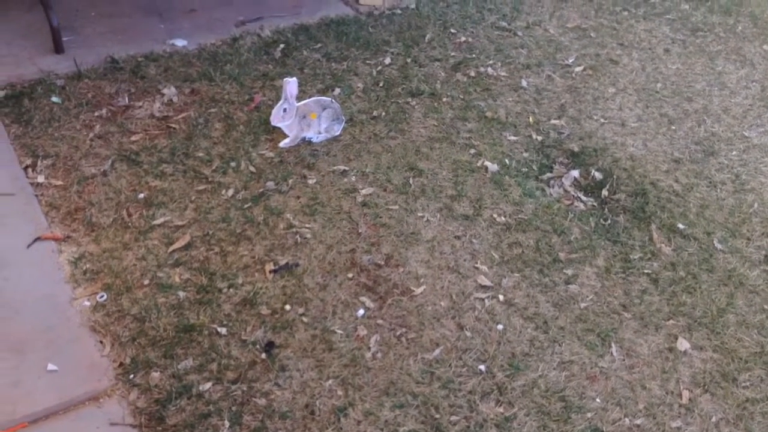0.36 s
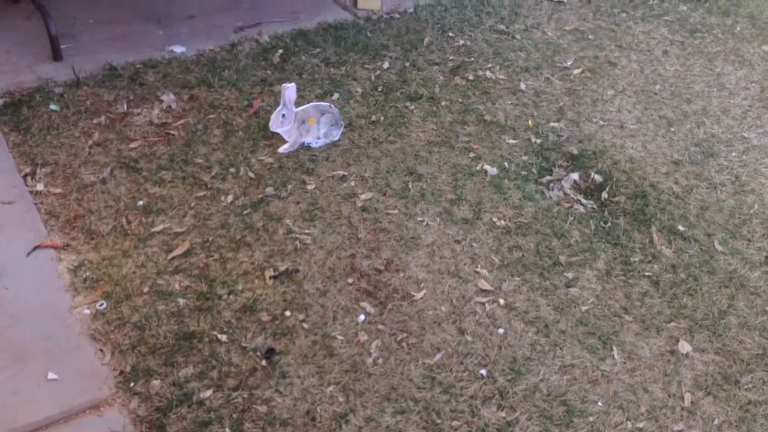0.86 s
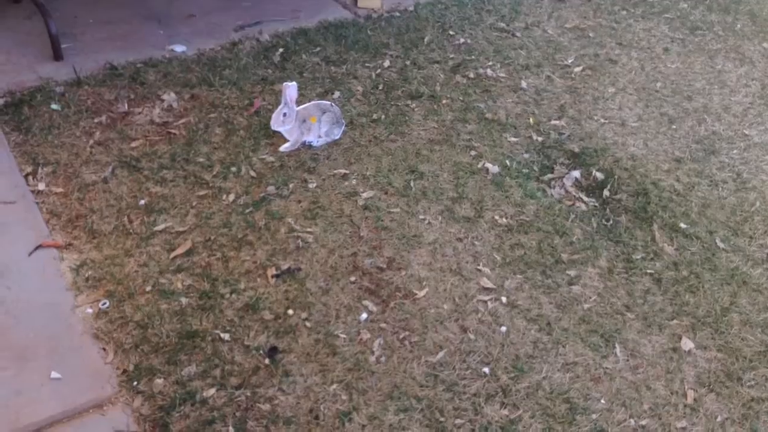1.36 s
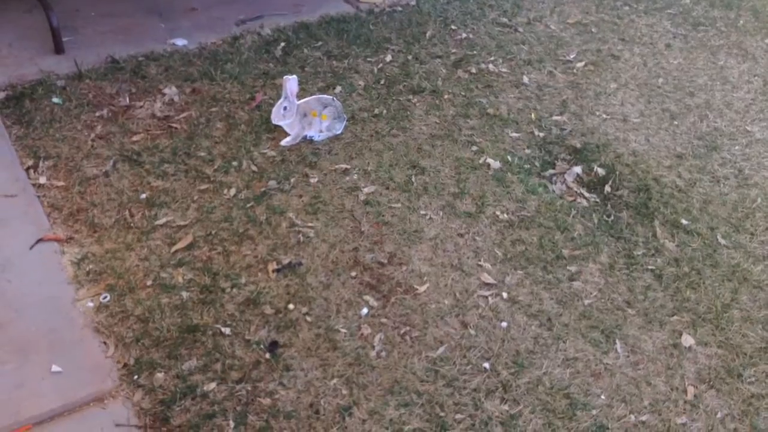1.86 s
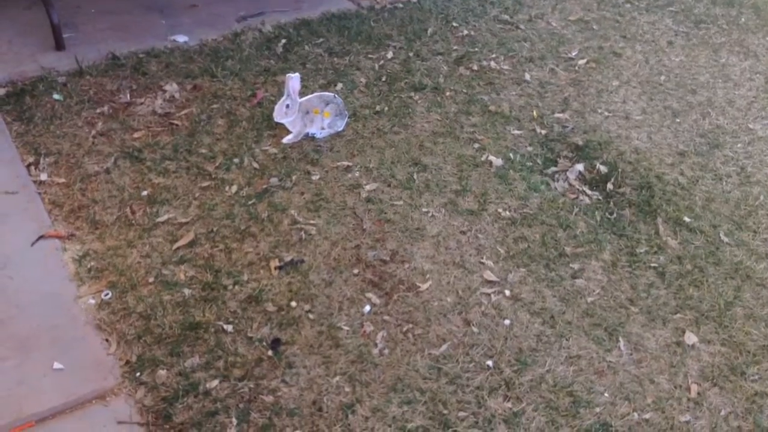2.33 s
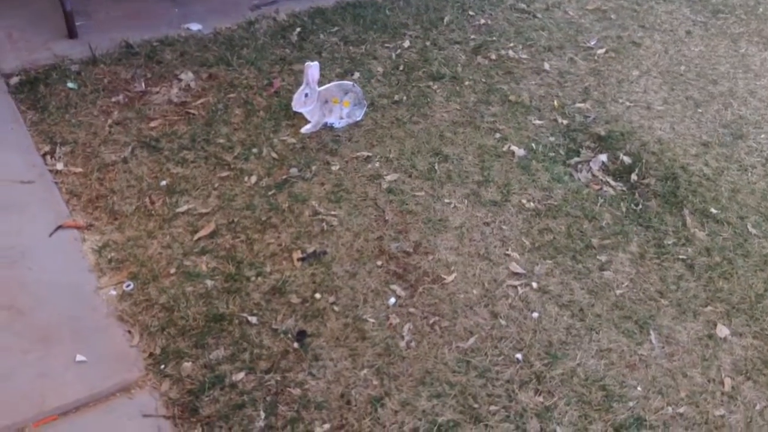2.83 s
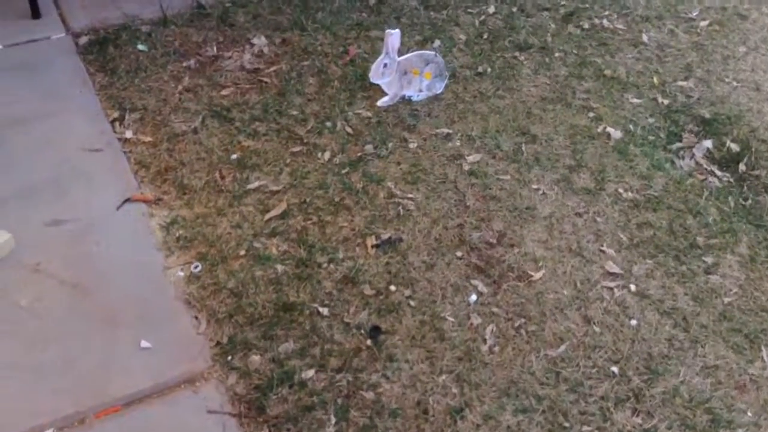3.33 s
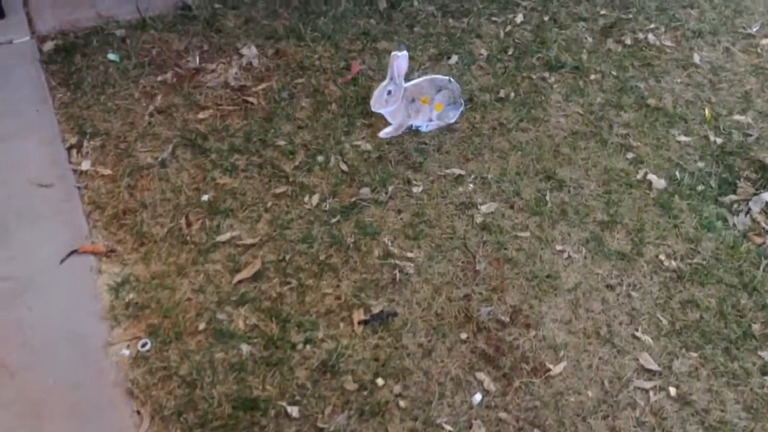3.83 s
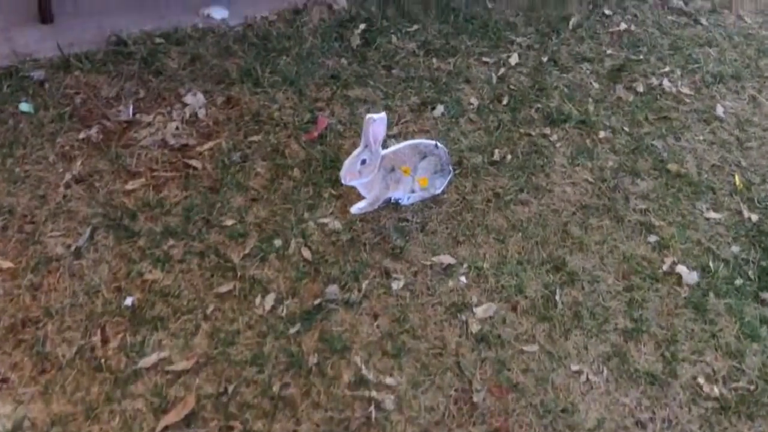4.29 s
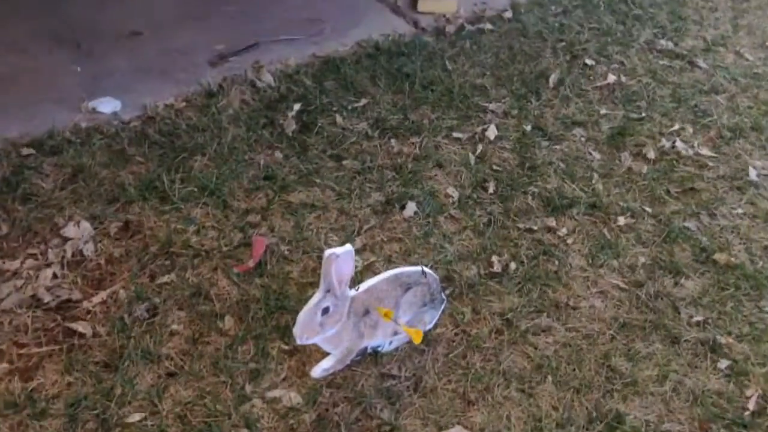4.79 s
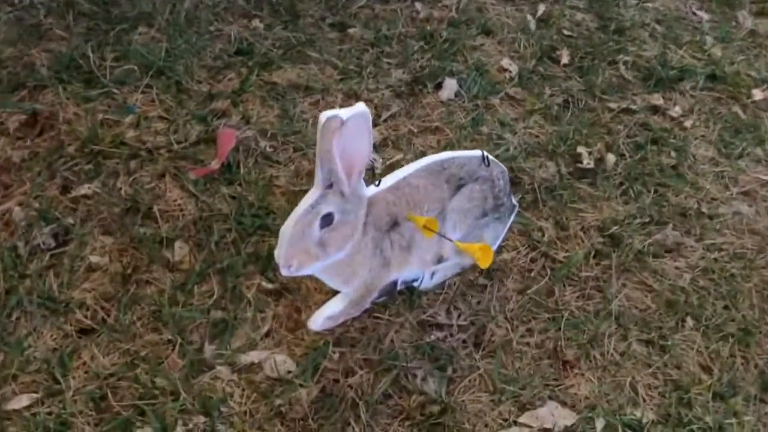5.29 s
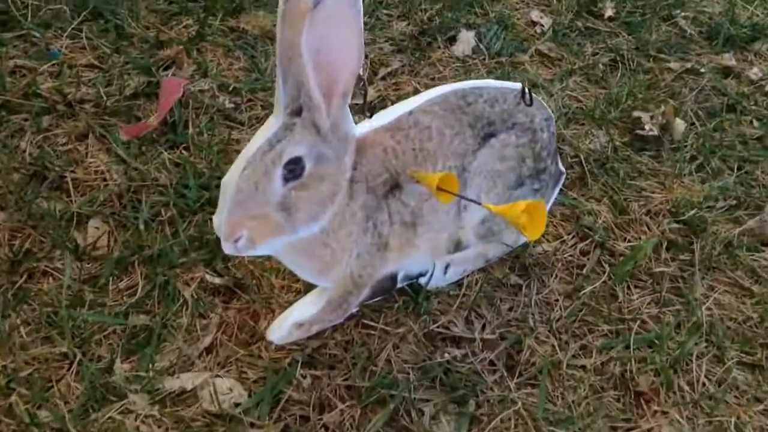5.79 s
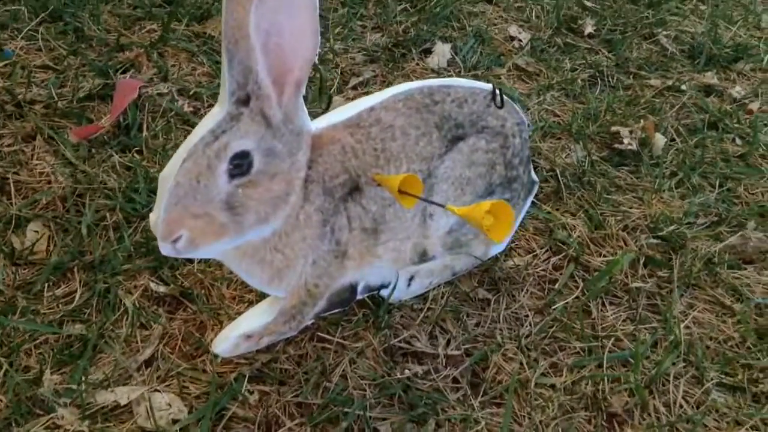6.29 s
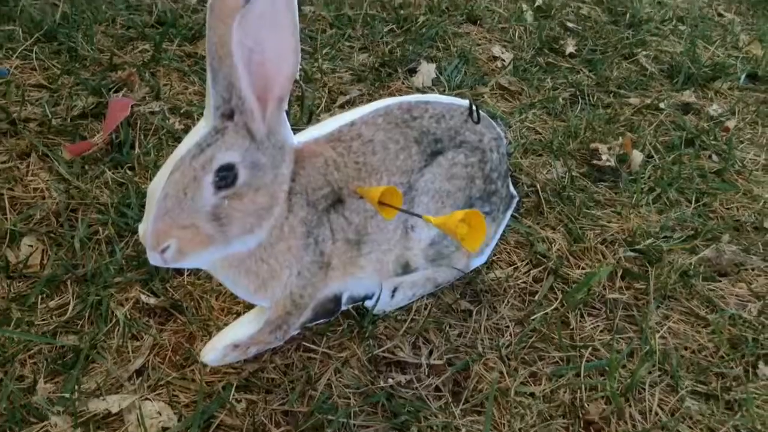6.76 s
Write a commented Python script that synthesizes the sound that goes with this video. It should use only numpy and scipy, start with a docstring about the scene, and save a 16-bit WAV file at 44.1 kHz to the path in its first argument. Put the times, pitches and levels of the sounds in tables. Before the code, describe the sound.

A blowgun pops and its dart cracks into a rabbit-shaped card almost instantly, echoes slapping off walls, while a low machine drone and fan rush continue.

```python
"""Blowgun shot in a yard

Air hisses ahead of the shot, the muzzle pops, and the dart whistles and smacks a card target: shaped noise and dying tones.
Walls throw pop and smack back as short slaps, one clear echo and scattered reflections; soft steps follow in grass.
A compressor hums as a stack of tones locked to its shaft, over the noise of its fan. Wall echoes change
the colour of the hum as the listener walks up to the target. One microphone feeds both channels."""
import sys
import numpy as np
from scipy import signal
from scipy.fft import rfft, irfft
from scipy.io import wavfile
from scipy.ndimage import uniform_filter1d

SR = 44100
rng = np.random.default_rng(int(sys.argv[2]) if len(sys.argv) > 2 else 0)


def ratio_of_db(decibels):
    """Turn decibels (scalar or array-like) into linear amplitude factors; 0 dB maps to 1."""
    return 10 ** (np.asarray(decibels, float) / 20)


def persist_wave(psi):
    """Save psi, clipped to +-1, as 16-bit WAV."""
    counts = np.round(np.clip(psi, -1, 1) * 32767).astype(np.int16)
    wavfile.write(sys.argv[1], SR, np.atleast_2d(counts).T)


N = 314874  # length [samples]
SHAFT_HZ = 29.02  # turns of the compressor shaft per second

# The listener's walk: (time [s], extra distance from the compressor [m])
WALK = [(2.3, 0), (2.8, .027), (3.2, .118), (3.6, .093), (4.0, .631), (4.4, .854), (4.8, 1.164),
        (5.2, 1.41), (5.7, 1.659), (6.3, 1.726), (7.1, 1.704)]
# Muzzle pop and its first reflections: (time [s], level [dB], share of treble [ratio], polarity [+1 or -1])
POPS = [(1.61845, -5, 1, 1), (1.62240, -11, .6, 1), (1.62493, -16, 1, 1), (1.6279, -15, .1, -1),
        (1.6318, -19, .1, -1), (1.6360, -19, .8, 1), (1.6411, -22, .7, -1), (1.6425, -22, .8, 1),
        (1.6466, -22, .3, -1)]


def read(points, hz):
    """Reads a spectrum between its points, on a log-frequency axis."""
    f, value = np.transpose(points)
    return np.interp(np.log(hz + 1), np.log(f + 1), value)


def evened(x):
    """Scales a sound to rms 1."""
    return x / np.sqrt(np.mean(x ** 2) + 1e-20)


def add(mix, s, sound):
    """Mixes a sound in at s seconds."""
    part = mix[round(s * SR):][:len(sound)]
    part += sound[:len(part)]


def coloured(size, points):
    """Noise of rms 1 with a given spectrum."""
    hz = np.fft.rfftfreq(size, 1 / SR)
    spectrum = rfft(rng.standard_normal(size)) * ratio_of_db(read(points, hz))
    return evened(irfft(spectrum, size))


def ring(modes, size=6000):
    """Sum of dying tones, as a struck body or air column gives."""
    t = np.arange(size) / SR
    return sum(ratio_of_db(db - 60 * t / t60) * np.sin(2 * np.pi * hz * t) for hz, db, t60 in modes)


def puff(ms, peak_ms):
    """Pulse shape that rises to 1 at peak_ms and then dies away."""
    return np.e * ms / peak_ms * np.exp(-ms / peak_ms)


def band(x, lo_hz, hi_hz):
    """Band-pass that never rings ahead of its input."""
    return signal.sosfilt(signal.butter(2, [lo_hz, hi_hz], "band", fs=SR, output="sos"), x)


def clatter(turns, place, size=4096):
    """Valve clatter: one random turn for each place, repeated and cross-faded along the walk."""
    # Clatter spectrum: (frequency [Hz], level per shaft order [dB])
    colour = [(500, -85), (700, -74), (1300, -74.5), (2000, -76), (3000, -76), (4500, -84), (8000, -104)]
    a, b = rng.standard_normal((2, 5, size // 2 + 1))
    level = ratio_of_db(read(colour, SHAFT_HZ * np.arange(size // 2 + 1)))
    one_turn = irfft((a + 1j * b) * level, size) * size / 2
    at = (turns % 1 * size).astype(int)
    return sum(np.cos(np.pi / 2 * np.clip(place - k, -1, 1)) * wave[at] for k, wave in enumerate(one_turn))


def compressor(waver=.009):
    """Multiples (orders) of the shaft rate; echoes add to or cancel each one as the detours change."""
    # What the compressor sends out: {order of the shaft: level [dB]}
    orders = {2: -83.5, 3: -75, 4: -73, 5: -67, 6: -59.5, 7: -49, 8: -70.5, 9: -50.5, 10: -56, 11: -75, 12:
              -69, 13: -64.5, 14: -86, 15: -74, 16: -72, 17: -85, 18: -67, 19: -70, 20: -72, 21: -75.5, 23:
              -79, 30: -73.5, 38: -73, 39: -72.5, 47: -71.5, 48: -74.5, 50: -71}
    # Walls that throw the hum back: (detour at the shooting spot [m], detour gained per metre walked [m/m],
    # signed share of the direct sound [ratio])
    walls = [(1.529, 0.265, 0.332), (3.83, -0.013, 0.095), (4.188, -0.659, -0.544), (4.962, 0.635, -0.633),
             (5.307, 0.001, -0.351), (6.758, 0.862, 0.122), (7.003, -0.578, -0.495), (8.023, 1.161, 0.254),
             (8.25, 0.158, -0.798), (8.592, -0.719, 0.184), (8.724, 0.477, 0.245), (9.392, -0.173, -0.415),
             (9.861, 1.176, -0.381), (14.245, -1.768, 0.127)]
    # Level of the side tone: (time [s], level [dB])
    side_level = [(0, -57), (1.2, -68.5), (3.2, -65), (3.8, -65), (4.8, -55.5), (5.4, -72), (7.14, -61)]
    side_hz = 347.2  # a faint tone that beats with the twelfth order
    smear = .568  # phase bend away from the seventh order [rad per order squared]: a stroke is a short sweep
    place_m = .43  # the clatter's fine pattern is new after this walk
    sound_speed = 343  # [m/s]

    t = np.arange(N) / SR
    # waver is the rms drift of the shaft in turns
    drift = evened(sum(np.sin(2 * np.pi * (f * t + rng.random())) / f for f in np.geomspace(.3, 3, 8)))
    walked = np.interp(t, *np.transpose(WALK))
    turns = SHAFT_HZ * (t - walked / sound_speed) + waver * drift

    # the echoes change slowly, so every 256th sample is enough
    coarse_t, coarse_walk = t[::256], walked[::256]
    side_amp = ratio_of_db(np.interp(t, *np.transpose(side_level)))
    hum = side_amp * np.cos(2 * np.pi * (side_hz * t + rng.random()))
    for k, db in orders.items():
        paths = 1  # direct sound, then the echoes
        for detour, gain, share in walls:
            delay = (detour + gain * coarse_walk) / sound_speed
            paths = paths + share * np.exp(-2j * np.pi * k * SHAFT_HZ * delay)
        phase = np.interp(t, coarse_t, np.unwrap(np.angle(paths))) + smear * (k - 7) ** 2
        strength = ratio_of_db(db) * np.interp(t, coarse_t, abs(paths))
        hum += strength * np.sin(k * 2 * np.pi * turns + phase)
    return np.sqrt(2) * hum + clatter(turns, np.clip(walked / place_m, 0, 4))


def rush(split_hz=4000, patchy_db=0.94, ripple_db=1.7):
    """Smooth fan noise; treble and body rise and fall as the microphone turns."""
    # Fan spectrum before the final level is set: (frequency [Hz], relative level per Hz [dB])
    colour = [(30, -36), (70, -37), (120, -28), (200, -0.5), (280, -4), (400, -4.5), (600, -2.5),
              (800, -5.5), (1000, -5), (1400, -3.5), (2200, -7), (3500, -9), (6000, -11.5), (9000, -11.5),
              (13000, -11.5), (15300, -13), (15450, -72)]
    # How squarely the microphone faces the fan: (time [s], treble [dB], body [dB])
    facing = [(0, -0.5, 0), (1.1, -1.4, -1), (2.2, -0.2, 0.5), (2.8, -0.1, -0.5), (3.2, -1.3, -0.5),
              (3.75, 1, 2.5), (4.45, -1.7, -0.5), (5.4, 1, -1.5), (6.0, 0, -2.5), (6.65, -3, -1.5),
              (7.14, -1.5, -2)]
    # the low rush is weaker at the shooting spot and fills in over the first steps
    shelter_db, shelter_hz, shelter_m = -4, 750, 0.25

    frames, hz = N // 256 + 5, np.fft.rfftfreq(1024, 1 / SR)
    a, b, patches, ripple = rng.standard_normal((frames, 513, 4)).T
    # reflections comb the spectrum finely and change slowly
    ripple = evened(uniform_filter1d(ripple, 120, 1))
    # broader patches come and go faster
    patches = evened(uniform_filter1d(uniform_filter1d(patches, 14, 0), 16, 1))

    t = np.arange(frames) * 256 / SR
    at, treble_db, body_db = np.transpose(facing)
    high = (1 / (1 + (split_hz / (hz + 1)) ** 4))[:, None]  # 0 in the body, 1 in the treble
    swing_db = high * np.interp(t, at, treble_db) + (1 - high) * np.interp(t, at, body_db)
    sheltered = 1 - np.clip(np.interp(t, *np.transpose(WALK)) / shelter_m, 0, 1)
    swing_db = swing_db + shelter_db * sheltered / (1 + (hz[:, None] / shelter_hz) ** 4)

    level_db = read(colour, hz)[:, None] + swing_db + patchy_db * patches + ripple_db * ripple
    noise = signal.istft((a + 1j * b) * ratio_of_db(level_db), nperseg=1024, noverlap=768)[1][:N]
    return ratio_of_db(-46.0) * evened(noise)


def hum_swells():
    """High tones of the compressor hum, each under a half-sine swell."""
    # High tones of the compressor hum that swell once: (start [s], end [s], frequency [Hz], level [dB])
    tones = [(2.6, 3.6, 638, -57), (2.5, 3.7, 1393, -62), (2.8, 4.7, 1364, -63), (0, 1.9, 1451, -64),
             (6.2, 7.14, 638, -64), (5.4, 7.14, 1131, -63)]
    out = np.zeros(N)
    for start, end, hz, db in tones:
        t = np.arange(0, end - start, 1 / SR)
        swell = np.sin(np.pi * t / t[-1])
        add(out, start, np.sqrt(2) * ratio_of_db(db) * swell * np.sin(2 * np.pi * hz * t))
    return out


def blow():
    """Air hiss swells while the dart runs down the tube and dies after the pop; the dart whistles."""
    # Spectrum of the air hiss: (frequency [Hz], relative level per Hz [dB])
    leak_colour = [(1500, -5), (3000, -2.5), (4800, -4), (6300, 2.5), (7300, -3), (9400, 4.5), (10500, 0.5),
                   (15200, -1), (15500, -50)]
    # Whistle of the dart, leaving the tube and in flight: (start [s], end [s], level [dB], fade by the end [dB])
    whistles = [(1.602, 1.64, -37, -17), (1.628, 1.69, -47.5, -2)]
    peak_db, lead_s, whistle_hz = -31, .125, 9386
    swell_db_per_s, drop_db, fade_db_per_s = 161, -1, 350

    out, t = np.zeros(N), np.arange(-lead_s, .08, 1 / SR)  # t is 0 at the pop
    leak_db = peak_db + np.where(t < 0, swell_db_per_s * t, drop_db - fade_db_per_s * t)
    hiss = ratio_of_db(leak_db) * signal.windows.tukey(len(t), .2) * coloured(len(t), leak_colour)
    add(out, POPS[0][0] - lead_s, hiss)
    for start, end, db, fade_db in whistles:
        t = np.arange(0, end - start, 1 / SR)
        tone = np.sin(2 * np.pi * whistle_hz * t) * signal.windows.tukey(len(t), .3)
        add(out, start, np.sqrt(2) * ratio_of_db(db + fade_db * (t / t[-1]) ** 2) * tone)
    return out


def bursts_and_knocks():
    """Short bursts of noise, each holding only part of the spectrum; then hollow knocks."""
    # Short noise bursts around the pop, then slaps of pop and smack off walls:
    # (time [s], level [dB], low edge [Hz], high edge [Hz], length [ms])
    bursts = [(1.6168, -31, 1500, 8000, 2), (1.6192, -28, 2000, 8000, 2), (1.6262, -31, 3000, 8000, 3),
              (1.6530, -36, 2000, 5000, 4), (1.6275, -32, 400, 1700, 3), (1.6320, -31, 500, 1500, 4),
              (1.6345, -32, 1500, 4800, 4), (1.6395, -31, 500, 1600, 5), (1.6455, -33, 500, 1500, 4),
              (1.6510, -35, 700, 1700, 5), (1.7200, -40, 600, 900, 7), (1.6810, -32, 380, 620, 9),
              (1.7040, -38, 300, 500, 8), (1.7230, -40, 320, 600, 8), (1.7100, -38, 1800, 2200, 9),
              (1.7000, -35, 900, 1100, 7), (1.7310, -41, 700, 2500, 5), (1.6950, -34, 270, 400, 12),
              (1.7085, -35, 880, 1020, 8), (1.7335, -39, 280, 480, 8), (1.7676, -35, 2400, 3200, 2),
              (1.7765, -42, 900, 3500, 6), (1.7825, -41, 700, 950, 5), (1.7935, -42, 720, 880, 9),
              (1.7950, -43, 1000, 5000, 4), (1.8170, -44, 680, 820, 7), (1.8200, -41, 280, 420, 13),
              (1.8090, -43, 1200, 4000, 5)]
    # Late hollow knocks: (time [s], level [dB], frequency [Hz], time to fall 60 dB [s])
    knocks = [(1.7861, -31, 810, .035), (1.8791, -30, 900, .028)]
    out = np.zeros(N)
    for (s, db, lo_hz, hi_hz, ms), noise in zip(bursts, rng.standard_normal((len(bursts), 1000))):
        size = min(round(ms * SR / 1000), 600)
        burst = band(band(noise, lo_hz, hi_hz), lo_hz, hi_hz)[-size:]
        add(out, s, ratio_of_db(db) * evened(burst) * signal.windows.tukey(size, .7))
    for s, db, hz, t60 in knocks:
        knock = ring([(hz, db, t60), (hz * 1.7, db - 6, t60 / 4)])
        add(out, s, -band(knock, 400, 3000))
    return out


def muzzle(push_ms=0.053, suck_ms=0.37):
    """A sharp snap on a pressure push with a slow undershoot, while the air column rings."""
    # Ringing air in the tube: (frequency [Hz], level [dB], time to fall 60 dB [s])
    tube = [(231, -21.5, 0.12), (349, -21.5, 0.06), (437, -19, 0.059), (870, -28, 0.038), (1076, -30, 0.07),
            (1330, -27, 0.11), (2010, -25, 0.024)]
    snap_hz, snap_ms = 4300, .17
    out, ms = np.zeros(N), np.arange(6000) / SR * 1000
    snap = np.sin(2 * np.pi * snap_hz * ms / 1000) * np.exp(-ms / snap_ms)
    push = puff(ms, push_ms) - .45 * puff(ms, suck_ms)
    for s, db, treble, sign in POPS:
        pop = 1.36 * treble * snap + 0.59 * push + ring(tube)
        add(out, s, sign * ratio_of_db(db) * pop)
    return band(out, 196, 10000)  # a small opening sends out no bass


def yard(x, decays, gap_s, uneven_db):
    """Scattered reflections, a few much stronger than the rest; each band dies at its own speed."""
    taps = np.zeros(SR // 2)
    at = np.arange(round(gap_s * SR), len(taps) - 20, 20)
    size = ratio_of_db(uneven_db * np.minimum(rng.exponential(1, len(at)), 4))
    taps[at + rng.integers(0, 20, len(at))] = rng.choice([-1., 1.], len(at)) * size
    hz, t, z = signal.stft(taps, SR, nperseg=128)
    fade = ratio_of_db(-60 * t / read(decays, hz)[:, None])
    tail = signal.istft(z * fade, SR, nperseg=128)[1]
    return signal.oaconvolve(x, tail / np.linalg.norm(tail))[:N]


def reflections(pop, crackle, body):
    """The yard nearby and the houses far off scatter the shot back."""
    # Decay in the yard: (frequency [Hz], time to fall 60 dB [s])
    near_decay = [(250, 0.074), (800, 0.1), (1100, 0.35), (2000, 0.26), (4000, 0.12), (8000, 0.18),
                  (15000, 0.13)]
    # Decay among far houses: (frequency [Hz], time to fall 60 dB [s])
    far_decay = [(250, 1), (800, 1), (2000, 0.98), (4000, 0.38), (8000, .15)]
    near = ratio_of_db(-8) * yard(pop, near_decay, gap_s=0.0098, uneven_db=6.5)
    near += ratio_of_db(-9.0) * yard(crackle, near_decay, gap_s=.0064, uneven_db=5.0)
    near += ratio_of_db(-24) * yard(body, near_decay, gap_s=.025, uneven_db=3)
    far = yard(pop + crackle + 0.63 * body, far_decay, gap_s=.04, uneven_db=1.0)
    return near + ratio_of_db(-20.5) * far


def target():
    """Each blow is a burst of crackle plus the ring of the card."""
    # Blows on the target: (time [s], crack level [dB], card ring level [dB])
    smacks = [(1.67827, -10.5, -16), (1.68075, -13, -21.3), (1.68175, -17, -45), (1.68377, -26, -19.8),
              (1.68719, -27, -18.3), (1.68952, -26, -20.1), (1.69384, -29, -26.6), (1.70273, -27, -26.1)]
    # Spectrum of the crack: (frequency [Hz], relative level per Hz [dB])
    crack_colour = [(300, -28), (1000, -17), (1300, -3), (1700, -3.5), (2400, -8.5), (3300, 0.5),
                    (4500, 2.5), (5500, 0), (6300, -3.5), (7200, -4.5), (8500, -8), (10800, -1),
                    (12000, -6.5), (13700, 0), (15000, -1), (15500, -9), (16500, -12)]
    # Ringing card: (frequency [Hz], level [dB], time to fall 60 dB [s])
    card = [(797, -5.2, .042), (875, -11.1, .049), (954, -3.2, .048), (324, -20, 0.075), (1440, -17, 0.016),
            (2056, -14, 0.03), (3500, -29, 0.012), (7240, -14, 0.025)]
    crack_ms = .62  # time to the crack's peak
    crackle, body, ms = np.zeros(N), np.zeros(N), np.arange(6000) / SR * 1000
    for s, crack_db, ring_db in smacks:
        add(crackle, s, ratio_of_db(crack_db) * coloured(len(ms), crack_colour) * puff(ms, crack_ms))
        add(body, s, -ratio_of_db(ring_db) * ring(card) * (1 - np.exp(-ms / .3)))
    # a small card sends out no bass
    return band(crackle, 170, 19000), band(body, 170, 19000)


def wall_echo(pop, crackle):
    """One flat wall returns the middle of the spectrum of pop and crack after a delay."""
    delay_s, level_db, lo_hz, hi_hz = .0888, -12.5, 1100, 4300
    out = np.zeros(N)
    returned = band(band(.5 * pop + crackle, lo_hz, hi_hz), lo_hz, hi_hz)
    add(out, delay_s, ratio_of_db(level_db) * returned)
    return out


def steps():
    """Dull puffs of noise under the shoe."""
    # Soft steps in grass: (time [s], level [dB], centre frequency [Hz])
    treads = [(4.550, -54, 420), (4.582, -48, 330), (4.91, -51, 750)]
    out, ms = np.zeros(N), np.arange(6000) / SR * 1000
    for s, db, hz in treads:
        noise = evened(band(rng.standard_normal(len(ms)), hz * 0.57, hz * 1.65))
        add(out, s, ratio_of_db(db) * noise * puff(ms, 16))
    return out


def scene():
    """Shot, reflections, steps and machine, the same in both channels."""
    ceiling_hz = 15420  # ceiling of everything but the crack
    pop, (crackle, body) = muzzle(), target()
    shot = pop + body + reflections(pop, crackle, body) + bursts_and_knocks() + blow() + wall_echo(pop, crackle)
    rest = shot + steps() + hum_swells() + compressor() + rush()
    ceiling = signal.firwin(1023, ceiling_hz, window=("kaiser", 9), fs=SR)
    mono = crackle + signal.oaconvolve(rest, ceiling, "same")
    return np.array([mono, mono])


def roll_off(x):
    """The treble ends steeply here."""
    return signal.sosfilt(signal.butter(12, 16470, fs=SR, output="sos"), x)


def record(dry):
    """The microphone drops the lowest bass, and a low-pass takes off the top treble."""
    thin = signal.sosfilt(signal.butter(3, 52, "high", fs=SR, output="sos"), dry)
    edge = signal.firwin(255, 16500, window=("kaiser", 9), fs=SR)
    mix = signal.oaconvolve(thin, edge[None], "same")
    return roll_off(mix)


dry = scene()
out = record(dry)
persist_wave(out)
```